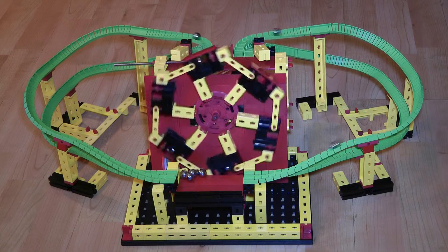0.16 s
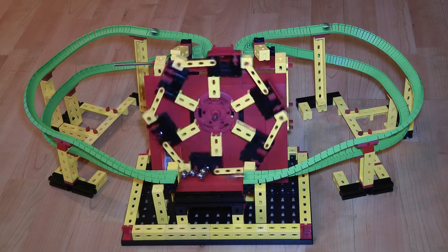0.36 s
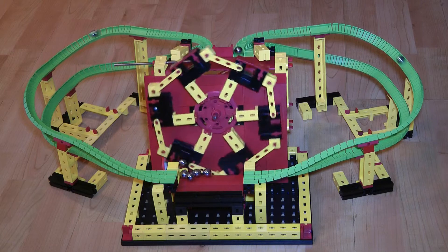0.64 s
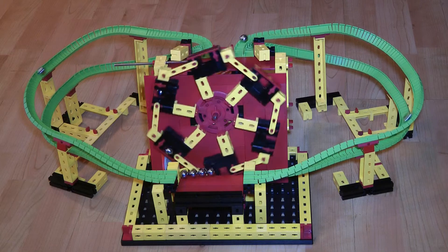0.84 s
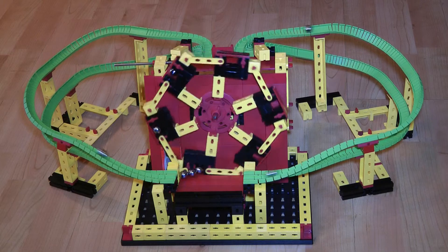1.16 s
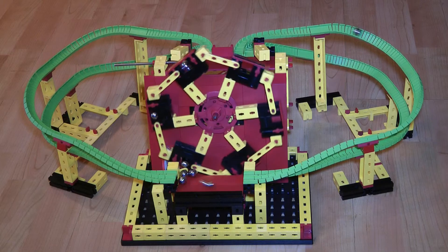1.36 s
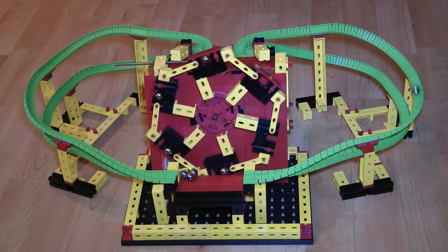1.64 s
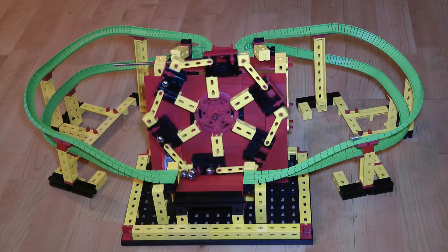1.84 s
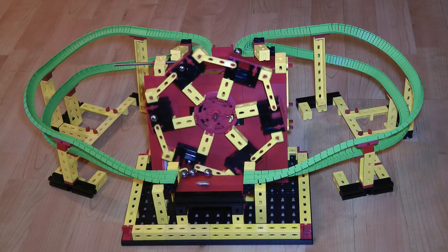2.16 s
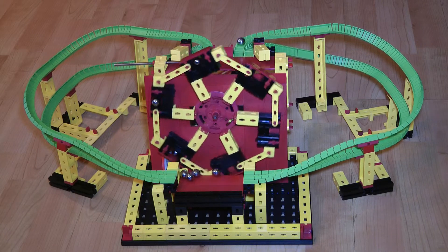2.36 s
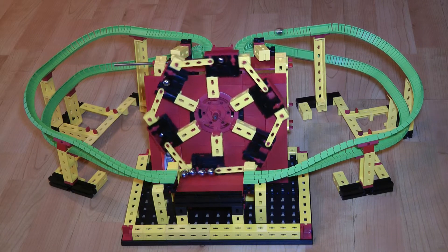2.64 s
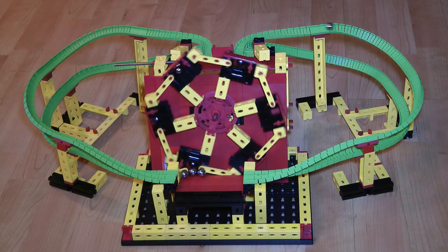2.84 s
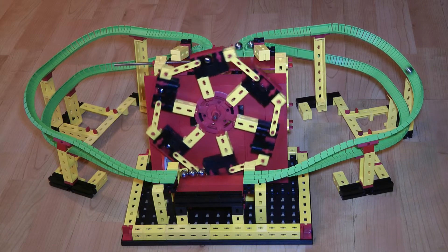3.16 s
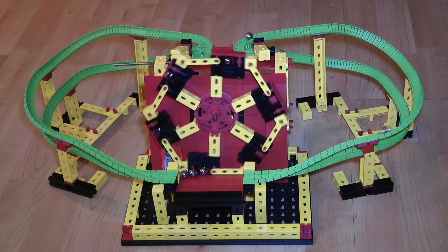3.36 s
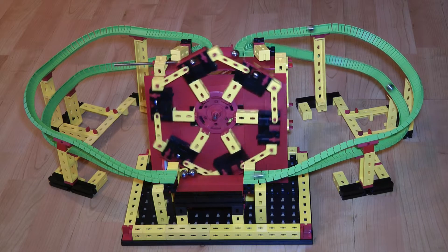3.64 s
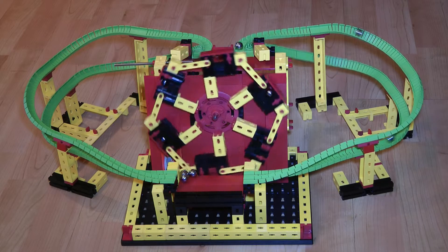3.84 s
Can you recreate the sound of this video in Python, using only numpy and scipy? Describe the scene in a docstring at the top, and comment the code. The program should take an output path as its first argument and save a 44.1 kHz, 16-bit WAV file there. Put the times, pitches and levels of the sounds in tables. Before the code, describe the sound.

Steel marbles click against each other and rattle along the ribbed plastic tracks of a marble machine throughout. They drop into a tray with sharp, briefly ringing cracks at about 0.5, 1.3, 1.4, 2.2 and 3.8 seconds. Faint high metal pings come near 0.2, 1.5, 2.3, 3.0 and 3.7 seconds. Underneath, a motorised lifting wheel rumbles softly, with light plastic knocks and brief scrapes, in a small, live room.

```python
"""Steel balls drop hard into the tray of a plastic marble machine; each cracks and rings tray and chute.
They click against each other and the plastic, roll along ribbed tracks, scrape into the lifting pockets
and now and then strike a small metal chime. A motor hums and its gears rumble as it turns the lifting
wheel, whose links knock. The machine stands on the floor of a small, live room with a quiet hiss."""
import sys
import numpy as np
from scipy import signal
from scipy.fft import rfft, irfft, next_fast_len
from scipy.io import wavfile
from scipy.ndimage import uniform_filter1d, map_coordinates

SR = 44100
rng = np.random.default_rng(int(sys.argv[2]) if len(sys.argv) > 2 else 0)


def int16_out(signal):
    """Quantize to a 16-bit WAV file."""
    q = np.round(np.clip(np.atleast_2d(signal).T, -1, 1) * 32767)
    wavfile.write(sys.argv[1], SR, q.astype(np.int16))


N = 176400


# ball landings: t/s, crack/dB, microphone overload/dB, tray ring/dB, chute ring/dB
LANDINGS = [(0.4838, -22.5, -47, -2, -7), (1.3373, -22, -46, 0, -7.5), (1.4357, -24, -48, -5, 3),
            (2.207, -22.5, -38, -2.5, -12), (3.7928, -21.5, -30, -4, -10)]
# broad resonances of the plastic: f/Hz, half-width/Hz, gain/dB
PLASTIC_RESONANCES = [(460, 200, -20), (1404, 400, -4.5), (2383, 240, 4), (3180, 490, 0.5), (3530, 380, -3),
                      (4340, 460, -1.5), (5160, 350, 3), (5940, 260, 5), (6500, 400, 1.5), (7540, 600, -4),
                      (9640, 960, -5.5), (12800, 9300, -15.5)]
# tray modes: f/Hz, level/dB, t60/s
TRAY_MODES = [(2285, 2, 0.17), (2445, -8, 0.13), (3330, -16, 0.17), (3580, 0, 0.36), (5210, -2, .17),
              (5775, -9, 0.11), (9800, -12, .1)]
# chute modes: f/Hz, level/dB, t60/s
CHUTE_MODES = [(1380, -4.5, 0.16), (1680, -0.5, 0.12), (1780, -3, 0.26), (3720, -5, .55), (4470, -3, 0.34)]

def drops():
    """A ball lands: a hard crack, tray and chute ring, the low thump of the microphone overloading."""
    def plastic_db(f):
        peaks = [amp(db) * peak(f - hz, width) for hz, width, db in PLASTIC_RESONANCES]
        return 20 * np.log10(np.max(peaks, axis=0))

    crack_s, overload_s, ring_db = .0024, .0079, -39
    places, overloads, t = np.zeros((2, N)), np.zeros(N), clock(4096)
    envelope = (t < crack_s) + amp(-21) * decay(t, t60_s=.032)
    u = 4 * t / overload_s
    overload_pulse = -np.e * u * (1 - u / 6) * np.exp(-u)  # brief offset of asymmetric clipping
    for i, (s, crack_db, overload_db, tray_db, chute_db) in enumerate(LANDINGS):
        add(places[i % 2], s, amp(crack_db) * burst(envelope, plastic_db, energy=176))
        tray = amp(tray_db) * ring(TRAY_MODES, blur_rad=.065)
        chute = amp(chute_db) * ring(CHUTE_MODES, blur_rad=.065)
        add(places[i % 2], s, amp(ring_db) * (tray + chute))
        add(overloads, s, amp(overload_db) * overload_pulse)
    return sum(room(place, wet_db=-4.5) for place in places) + room(overloads, wet_db=-11.5)


# ball contacts: t/s, level/dB, body/dB, middle/dB, top/dB, struck spot f/Hz
CONTACTS = [(0.1692, -36, 0, 12.5, 3.5, 7600), (0.1833, -37.5, -22, 6, -5, 7500),
            (0.2331, -41.5, -9, -12, 4, 7600), (0.3153, -35.5, 0.5, 0, -5.5, 4470),
            (0.3627, -40, -12, -8, 0, 5540), (0.3715, -27, -7.5, -8, -14, 6000),
            (0.3833, -34, -2, -4, -17, 4760), (0.4228, -36.5, 11, 2, -12, 4650),
            (0.4636, -31, -5.5, -9, -17, 3030), (0.5215, -30.5, -12, -17, -15, 3070),
            (0.5517, -29.5, -5, 2.5, -16, 5380), (0.5767, -31, -1.5, -1, -2, 6670),
            (0.6441, -38.5, 7, 0, 4.5, 3750), (0.668, -45, -3, -5, 6, 5200),
            (0.7288, -38, 8.5, -8, -4, 7360), (0.8522, -36, 7.5, 6, -11, 4740),
            (0.9324, -39, -2, -3, -14, 1970), (0.983, -48, -6, -1, -13, 6100),
            (1.0273, -35, -3.5, 2, -10, 6600), (1.0406, -33, -14, 9, -36, 3830),
            (1.0847, -33.5, -5, 1, -8, 3550), (1.1158, -29.5, -6.5, -13, -9.5, 5070),
            (1.1393, -33, -33, -14, -37, 4770), (1.1531, -40, -16, -5, -22, 6000),
            (1.1755, -34, 2, 0, -8, 3700), (1.1982, -30.5, 0, -4, -5.5, 5060),
            (1.2305, -30.5, -4, -9, -7, 4440), (1.2414, -32.5, 2, -5, -8, 4540),
            (1.3726, -30, -23, -5, -10, 2450), (1.4128, -29, -1, 4, -10, 5350),
            (1.4618, -35, -5, -6, 14, 3800), (1.4718, -43, -14, 4, 12, 4570),
            (1.4916, -30.5, -3, -2, -9, 6040), (1.5025, -32, -9, -8, -13, 3715),
            (1.6063, -35.5, 12.5, -1, 5, 5870), (1.6304, -37.5, 7, -16, -11, 6550),
            (1.6812, -40, 6, 3, -18, 2880), (1.7208, -39.5, -3, -1, -16, 2180),
            (1.7843, -28.5, -14, -8, -13.5, 6030), (1.9118, -35.5, -8, -1, -8, 2120),
            (1.9502, -32.5, -28, -14, -9.5, 5100), (1.9721, -35.5, -33, -7, -26, 4500),
            (2.0159, -34, 0, 3, -6.5, 4530), (2.0741, -41.5, 4, -10, -4, 2760),
            (2.0991, -39, 6, 6, -7, 4540), (2.2433, -32, -21, 3, -6, 3560), (2.2824, -32, -6, 2, -9, 5710),
            (2.3293, -34.5, -14, 5, 3, 5250), (2.3941, -42, -20, -14, -16, 4670),
            (2.4141, -49, -12, -12, 2, 8150), (2.4491, -44, -14, -19, 0, 6030),
            (2.4826, -41, -5, -2, -8, 2940), (2.5468, -40, -2, 11, -4, 2190),
            (2.5863, -38, -39, -5, -29, 4700), (2.5992, -36, -4.5, -15, -24, 4560),
            (2.6095, -33, -11, -5, -9, 3860), (2.6983, -42, 5, 11, 4, 4100),
            (2.7281, -35.5, 0, -2, -4, 5080), (2.7374, -43, -3, 0, -2, 5530),
            (2.8445, -40.5, -1, -17, -20, 3280), (2.8842, -39.5, 3, -16, -34, 5250),
            (2.9096, -28.5, 3.5, -3, -13, 7400), (2.952, -34.5, 3, -8, -12.5, 2000),
            (3.1469, -36, 0, -4.5, -17, 2600), (3.1841, -37.5, 7, -2, -19, 4950),
            (3.2489, -40.5, -4, 11, -8, 2200), (3.2765, -34.5, 0, -6, -39, 4330),
            (3.3106, -30.5, -15, -8, -15, 6200), (3.3328, -35, -9, -2, -9, 5530),
            (3.3912, -38.5, 2, -2, -10, 4700), (3.4439, -29.5, -19, 0, -21, 3330),
            (3.4536, -35.5, -30, -9, -27, 3250), (3.5149, -35.5, -24, -13, -15, 5340),
            (3.5287, -29.5, 3, -10.5, -11.5, 2410), (3.8293, -32, -23, -5, -9, 3630),
            (3.8657, -31, -17, -2, -11, 2980), (3.8844, -30, -11, -6, -16, 4800),
            (3.9163, -33, -14, -13, 6, 4610), (3.9535, -41, 7, -5, -10, 2370)]

def clicks():
    """Balls tap each other and the plastic at three places, each with its own echoes."""
    spot_db = 10
    places, t = np.zeros((3, N)), clock(2048)
    envelope = decay(t, t60_s=.0047) + amp(-9.5) * decay(t, t60_s=.031)
    for i, (s, db, body_db, middle_db, top_db, hz) in enumerate(CONTACTS):
        colour = [(120, body_db - 30), (320, body_db - 5.5), (1100, body_db - 4), (2500, middle_db),
                  (4200, 1), (5800, -2.1), (8500, top_db + 3), (15000, top_db - 7.5)]
        gain_db = lambda f: along(colour, f) + spot_db * peak(f - hz, half_width=300)
        add(places[i % 3], s, amp(db - 2) * burst(envelope, gain_db, energy=176))
    return sum(room(place, wet_db=-2) for place in places)


# chime strikes: t/s, level/dB
CHIME_STRIKES = [(.157, -34.5), (1.526, -34), (2.337, -36), (3.037, -34.5), (3.713, -36.5)]
# chime modes: f/Hz, level/dB, t60/s
CHIME_MODES = [(7670, -6, 0.21), (7500, -11, 0.17), (12350, -1, 0.099), (12370, -2, 0.06)]

def chime():
    """A passing ball strikes the chime: a rough tap around an upper mode, then the ring."""
    attack_s, tap_hz = .0014, CHIME_MODES[2][0]
    tap_db = lambda f: 20 * np.log10(peak(f - tap_hz, half_width=300))
    out, t = np.zeros(N), clock(2048)
    for s, db in CHIME_STRIKES:
        tone = ring(CHIME_MODES, blur_rad=.05)
        attack = 1 - np.exp(-clock(len(tone)) / attack_s)
        add(out, s, amp(db - 1.5) * tone * attack)
        add(out, s, amp(db - 3) * burst(decay(t, t60_s=.025), tap_db, energy=100))
    return room(out, wet_db=-2)


# rolling loudness: t/s, level/dB
ROLL_LEVEL = [(.08, -48), (.2, -52.5), (.29, -53.5), (.33, -43), (.46, -48), (.55, -72), (.67, -48),
              (.83, -59), (.95, -51), (1.01, -51), (1.06, -50.5), (1.24, -42.5), (1.33, -67), (1.47, -38.5),
              (1.62, -52), (1.76, -51), (1.87, -54), (1.92, -46), (2.03, -47), (2.19, -58.5), (2.3, -43.5),
              (2.43, -58.5), (2.54, -53), (2.63, -49), (2.8, -56), (2.9, -51), (3.05, -51.5), (3.13, -51),
              (3.26, -52), (3.46, -44.5), (3.57, -51.5), (3.66, -53.5), (3.71, -44), (3.78, -49.5),
              (3.88, -40.5), (4, -62)]
# rib contact spectrum: f/Hz, gain/dB
RIB_SPECTRUM = [(300, -38), (900, -6), (1500, 2.5), (2200, 3.5), (3500, 0), (4800, 2), (6500, -5),
                (8500, -5.5), (12000, -26), (16000, -20)]
# ball-on-ball tick spectrum: f/Hz, gain/dB
TICK_SPECTRUM = [(500, -26), (2500, -27), (6000, 23), (10000, -3), (16000, -34)]

def rolling():
    """Balls run over the track ribs, bump the walls and tick against each other."""
    level = amp(curve(ROLL_LEVEL) + 2 * wobble(knots_per_s=28.34))
    ribs = amp(-7) * patter(RIB_SPECTRUM, per_s=420, spread_db=2)
    bumps = amp(-8) * rattle()
    t = clock(512)
    contacts = patter(TICK_SPECTRUM, per_s=22, spread_db=1.8)
    tick = decay(t, t60_s=.011) * rng.standard_normal(len(t))
    ticks = signal.fftconvolve(contacts, tick)[:N]
    return room(level * (ribs + bumps) + amp(-59) * unit(level * ticks), wet_db=-4)


def rattle():
    """Balls bump the track walls at random: short pitched rings, rms 1."""
    bumps_per_s, candidates = 170, 1200
    centre_hz, spread_oct, spread_db, t60_cycles, attack_s = 3776, .425, 5, 32, .0005
    out, t = np.zeros(N), clock(1024)
    attack = 1 - np.exp(-t / attack_s)
    timing = rng.random((candidates, 2))
    scatter = np.clip(rng.standard_normal((candidates, 2)), -2, 2)
    for (chance, when), (pitch, strength) in zip(timing, scatter):
        if chance < bumps_per_s * N / SR / candidates:
            hz = centre_hz * 2 ** (spread_oct * pitch)
            bump = attack * decay(t, t60_cycles / hz) * np.sin(2 * np.pi * hz * t)
            add(out, when * (N - 1) / SR, amp(spread_db * strength) * bump)
    return unit(out)


# balls scraping into the lifting pockets: t/s, length/s, level/dB
POCKET_ENTRIES = [(0.47, 0.068, -40.5), (0.549, .04, -44), (1.08, 0.038, -47.5), (1.195, .03, -49),
                  (1.226, 0.034, -43.5), (1.45, 0.029, -52), (1.918, 0.028, -47), (2.71, 0.036, -46.5),
                  (3.375, .025, -48.5), (3.577, .02, -47.5), (3.864, 0.038, -45.5)]
# steel-on-plastic slip spectrum: f/Hz, gain/dB
SLIP_SPECTRUM = [(300, -26), (2000, 3.5), (6000, -0.5), (10000, -2), (16000, -12)]

def scrapes():
    """Steel slips over plastic in a dense, bright sizzle."""
    pressure = np.zeros(N)
    for s, length_s, db in POCKET_ENTRIES:
        add(pressure, s, amp(db) * signal.windows.tukey(int(length_s * SR)))
    return room(pressure * patter(SLIP_SPECTRUM, per_s=900, spread_db=5), wet_db=-4.5)


# wheel links tipping: t/s, level/dB, f/Hz
LINK_TIPS = [(.175, -44.5, 563), (.408, -44.5, 413), (0.476, -37.5, 315), (.508, -39, 544),
             (.72, -41.5, 620), (.759, -43.5, 555), (1.083, -46, 487), (1.115, -42.5, 387),
             (1.175, -35.5, 347), (1.21, -38.5, 342), (1.239, -39.5, 378), (1.59, -40, 630),
             (1.634, -40.5, 580), (1.911, -43.5, 490), (2.015, -36, 315), (2.076, -44.5, 436),
             (2.61, -52, 485), (2.71, -47, 516), (2.908, -43, 340), (2.952, -36.5, 756),
             (3.184, -44.5, 556), (3.527, -38, 325), (3.574, -45, 560), (3.685, -46, 596),
             (3.712, -45, 534)]

def knocks():
    """The wheel's links tip over with a dry, gritty plastic knock."""
    half_width_oct, low_cut_hz = .34, 215
    out, envelope = np.zeros(N), decay(clock(4096), t60_s=.034)
    grit = lambda f: amp(-22) / (1 + f / 3000)
    low_cut = lambda f: 1 / (1 + (low_cut_hz / (f + 1)) ** 8)
    for s, db, hz in LINK_TIPS:
        body = lambda f: peak(np.log2((f + 1) / hz), half_width_oct)
        gain_db = lambda f: 20 * np.log10((body(f) + grit(f)) * low_cut(f))
        add(out, s, amp(db - 3.5) * burst(envelope, gain_db, energy=400))
    return room(out, wet_db=-9)


# gear rumble under load: t/s, level/dB
GEAR_LEVEL = [(.1, -53), (.17, -54), (.28, -56.5), (.45, -50), (.66, -55.5), (.78, -57), (.83, -55.5),
              (.96, -53), (1.05, -56), (1.24, -48), (1.32, -56.5), (1.62, -55), (1.8, -55.5), (2.1, -55),
              (2.2, -63.5), (2.33, -58), (2.42, -66), (2.56, -62), (2.63, -58), (2.73, -55.5), (2.8, -56),
              (2.97, -53.5), (3.1, -57), (3.2, -55), (3.42, -54), (3.6, -55.5), (4, -55.5)]
# gear tooth spectrum: f/Hz, gain/dB
TOOTH_SPECTRUM = [(30, -25), (120, -24), (190, -10.5), (270, 2), (400, 3.5), (480, 2), (600, 8), (750, 4),
                  (950, -10), (1500, -21), (3000, -3), (16000, -18.5)]

def drive():
    """Gear teeth rumble and swell with the load, over the motor's uneven hum."""
    hum_hz = 92
    load = amp(curve(GEAR_LEVEL) + 2.56 * wobble(knots_per_s=14))
    gears = amp(-2) * load * patter(TOOTH_SPECTRUM, per_s=300, spread_db=2.7)
    hum = amp(-73) * stereo_noise(lambda f: peak(f - hum_hz, half_width=19))
    return room(gears, wet_db=-2) + hum


# room hiss spectrum: f/Hz, gain/dB
AIR_SPECTRUM = [(25, -6), (100, -18), (200, 3), (1000, -13), (5000, 4), (16000, -34)]

def air():
    """The room's quiet, steady hiss."""
    return amp(-65.5) * stereo_noise(lambda f: amp(along(AIR_SPECTRUM, f)))


# reverberation time: f/Hz, t60/s
REVERB_T60 = [(100, 0.17), (400, 0.38), (1500, 0.56), (4000, 0.47), (8000, 0.26), (14000, 0.34)]
# reverberation width: f/Hz, side re mid/dB
REVERB_WIDTH = [(100, -5.5), (250, -4), (600, -9.5), (1200, -8), (2200, -8.5), (4000, -17.5), (8000, -20),
                (14000, -48)]

def room(x, wet_db):
    """Direct sound, a cluster of wall echoes, then a tail that lasts longest in the midrange."""
    wall_s, wall_spread_s, wall_db = .0093, .0012, -5
    hz, t, spectra = signal.stft(rng.standard_normal((2, SR // 2)), SR, nperseg=256)
    tail = signal.istft(spectra * decay(t, along(REVERB_T60, hz)[:, None]), SR, nperseg=256)[1]
    late_s = clock(tail.shape[1]) - wall_s
    tail *= np.where(late_s > 0, 1, .4)
    walls = rng.standard_normal(tail.shape) * (late_s > 0) * np.exp(-abs(late_s) / wall_spread_s)
    response = tail / np.linalg.norm(tail[0]) + amp(wall_db) * walls / np.linalg.norm(walls[0])
    mid, side = amp(wet_db) * signal.fftconvolve(x[None], response, axes=1)[:, :N]
    side = filtered(side, lambda f: amp(along(REVERB_WIDTH, f)))
    return np.array([x + mid + side, x + mid - side])


def burst(envelope, gain_db, energy):
    """A noise burst, flattened, then coloured; energy is its sum of squares."""
    smooth_hz = 350
    noise = envelope * rng.standard_normal(len(envelope))
    power = abs(uniform_filter1d(abs(rfft(noise)) ** 2, int(smooth_hz * len(noise) / SR)))
    y = minimum_phase(noise, lambda f: gain_db(f) - 10 * np.log10(power / power.mean() + 1e-6))
    return y * np.sqrt(energy / np.sum(y ** 2))


def ring(modes, blur_rad, scatter_db=2):
    """Damped sines, varied at each strike; phases wander by blur_rad a sample."""
    out, t = np.zeros(16384), clock(16384)
    for hz, db, t60_s in modes:
        level = amp(db + scatter_db * rng.normal())
        phase = 2 * np.pi * (hz * t + rng.random())
        wander = blur_rad * np.cumsum(rng.standard_normal(len(t)))
        out += level * decay(t, t60_s) * np.sin(phase + wander)
    return out


def patter(spectrum, per_s, spread_db):
    """Tiny contacts of random time and strength, rms 1."""
    hits = rng.random(N) < per_s / SR
    strength = amp(spread_db * np.clip(rng.standard_normal(N), -2, 2))
    impulses = hits * strength * rng.choice([-1, 1], N)
    return unit(filtered(impulses, lambda f: amp(along(spectrum, f))))


def stereo_noise(response, side_db=-6):
    mid, side = unit(filtered(rng.standard_normal((2, N)), response))
    return mid + amp(side_db) * np.array([side, -side])


def filtered(x, response):
    size = next_fast_len(N + SR // 2)
    return irfft(rfft(x, size) * response(np.fft.rfftfreq(size, 1 / SR)), size)[..., :N]


def minimum_phase(x, gain_db):
    """A short sound through a causal filter."""
    n = len(x)
    cepstrum = irfft(np.log(amp(gain_db(np.fft.rfftfreq(n, 1 / SR))) + 1e-6))
    cepstrum[1:n // 2] *= 2
    cepstrum[n // 2 + 1:] = 0
    return irfft(rfft(x) * np.exp(rfft(cepstrum)))


def along(points, hz):
    """Interpolate (f/Hz, value) points on a log axis."""
    f, values = np.transpose(points)
    return np.interp(np.log(hz + 1), np.log(f + 1), values)


def curve(points):
    return np.interp(clock(N), *np.transpose(points))


def wobble(knots_per_s):
    """A smooth random curve."""
    return map_coordinates(rng.standard_normal(N // 50), [np.arange(N) * knots_per_s / SR])


def peak(offset, half_width):
    return 1 / (1 + (offset / half_width) ** 2)


def decay(t, t60_s):
    return amp(-60 * t / t60_s)


def amp(db):
    return 10 ** (np.asarray(db) / 20)


def unit(x):
    return x / np.sqrt(np.mean(x ** 2) + 1e-20)


def clock(samples):
    return np.arange(samples) / SR


def add(track, s, sound):
    start = int(round(s * SR))
    track[start:start + len(sound)] += sound[:N - start]


def scene():
    return drops() + clicks() + knocks() + chime() + rolling() + drive() + air() + scrapes()


# microphone balance: f/Hz, left minus right/dB
MIC_BALANCE = [(100, -2.5), (250, 0.5), (600, 1.2), (1100, 2.3), (2000, 0.5), (4000, -0.1), (12000, -0.1)]
# microphone phase: f/Hz, left lead/rad
MIC_LEAD = [(200, 0.3), (1000, 0.31), (4000, 0.27), (8000, .24), (14000, 0.09)]

def record(dry):
    """The microphones colour the sides, round off the loudest cracks and cut the top; silent at first."""
    ceiling, start_s, top_hz = .27, .079, 15780
    sides = np.array([[.5], [-.5]])
    mics = lambda f: amp(along(MIC_BALANCE, f) * sides) * np.exp(1j * along(MIC_LEAD, f) * sides)
    x = filtered(dry, mics)
    x = x / (1 + abs(x / ceiling) ** 4) ** (1 / 4)
    x *= clock(N) > start_s
    return filtered(x, lambda f: np.clip((top_hz - f) / 400 + .5, 0, 1))


dry = scene()
out = record(dry)
int16_out(out)
```